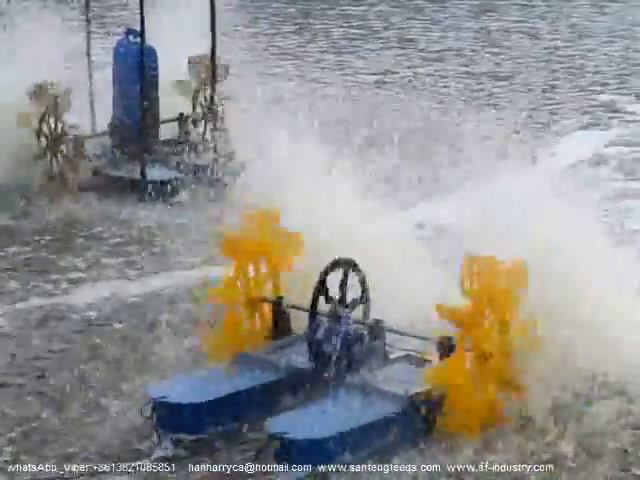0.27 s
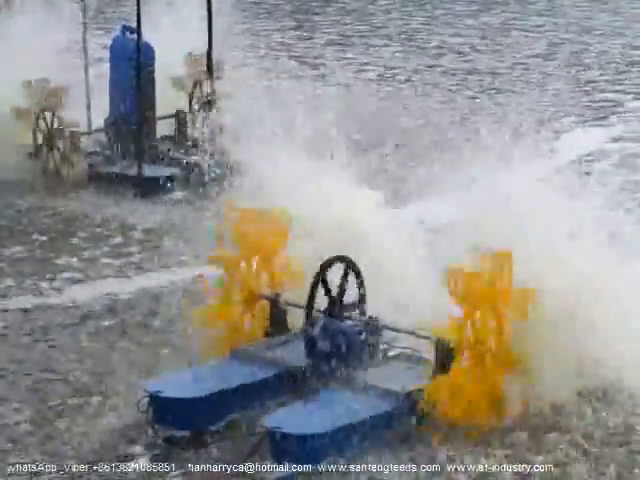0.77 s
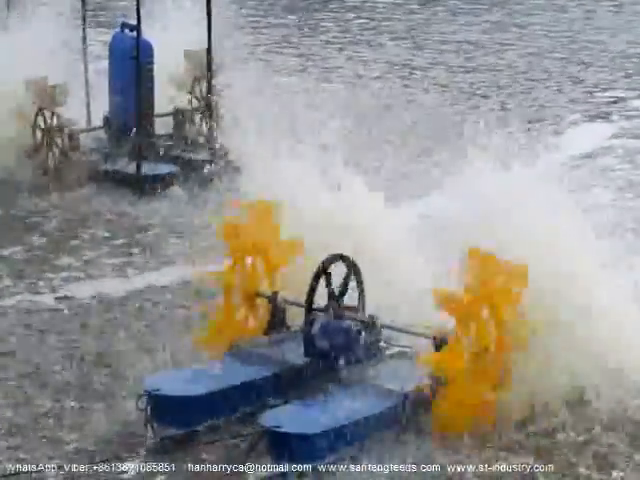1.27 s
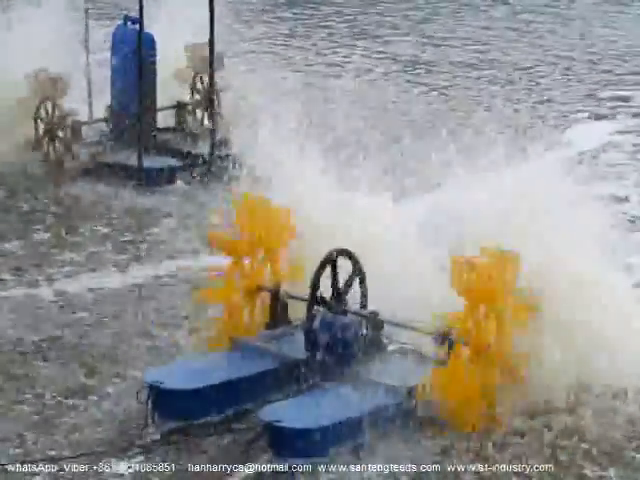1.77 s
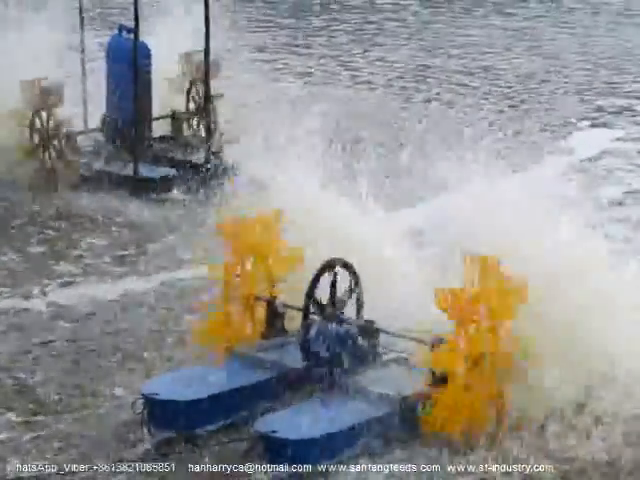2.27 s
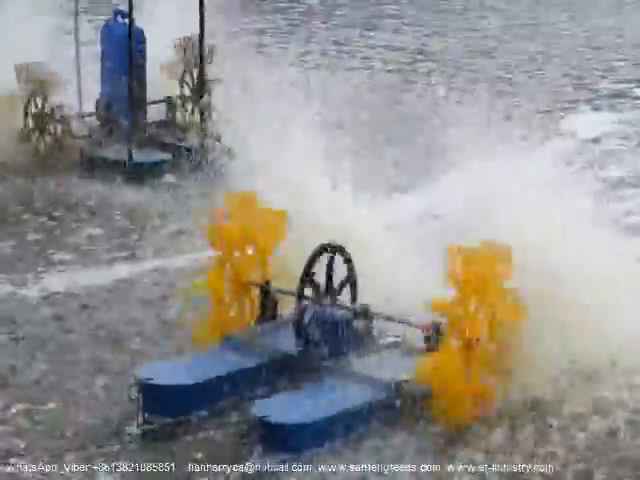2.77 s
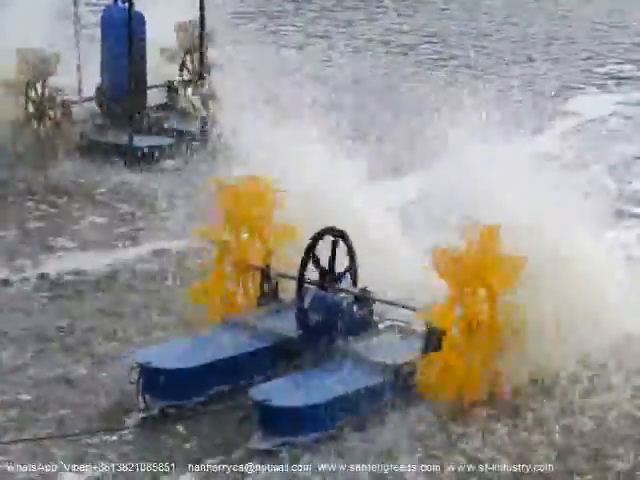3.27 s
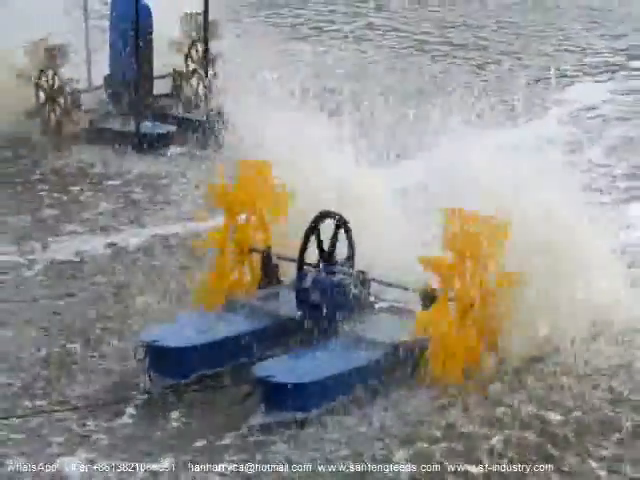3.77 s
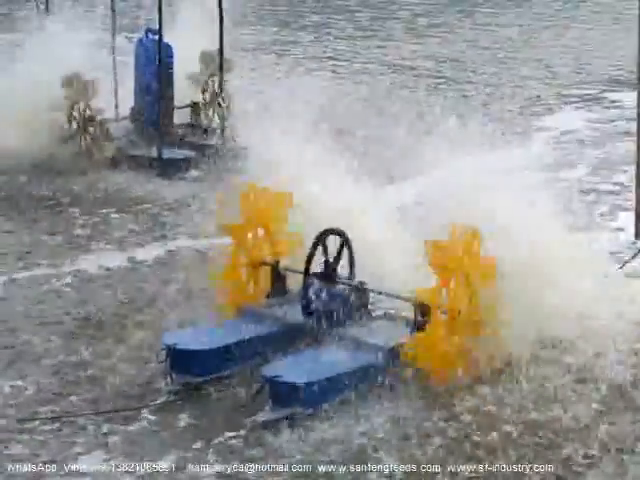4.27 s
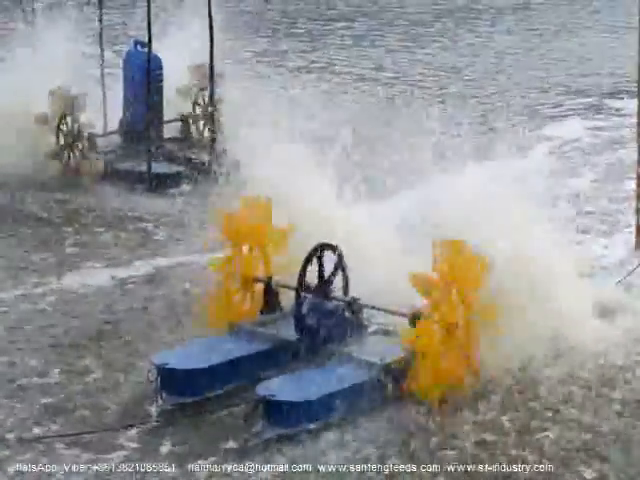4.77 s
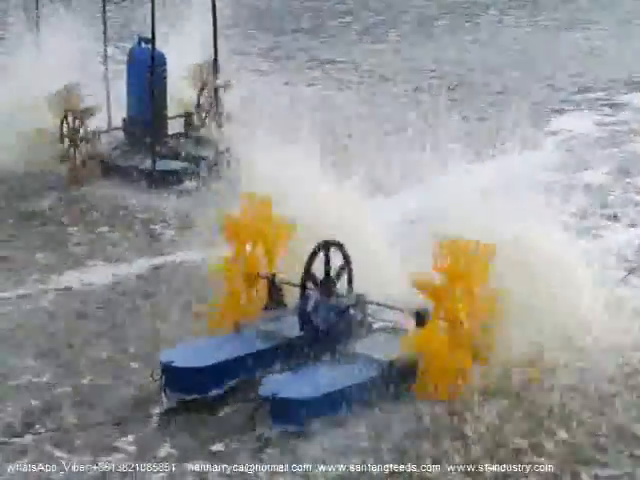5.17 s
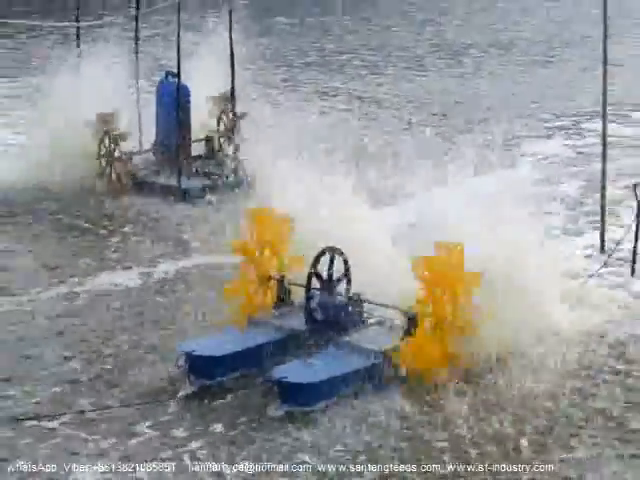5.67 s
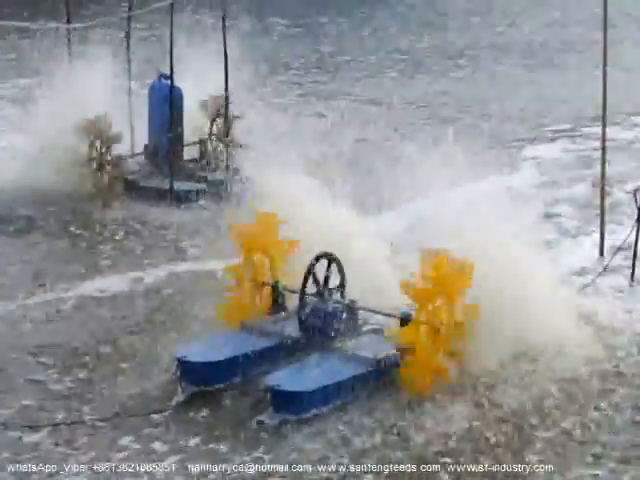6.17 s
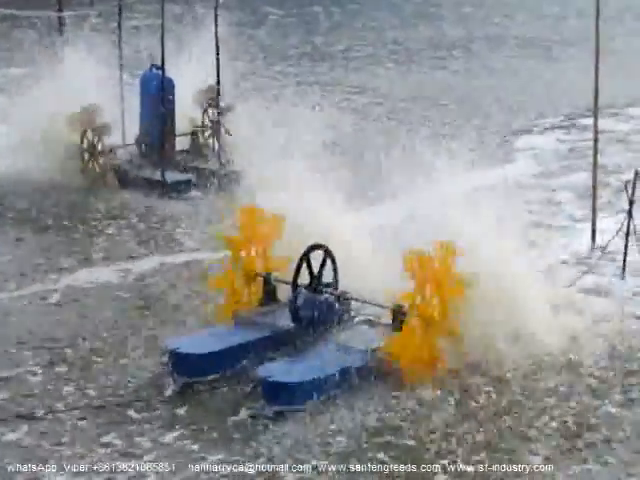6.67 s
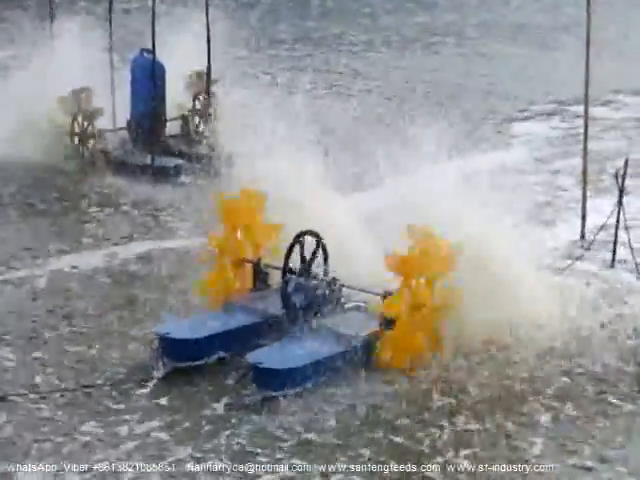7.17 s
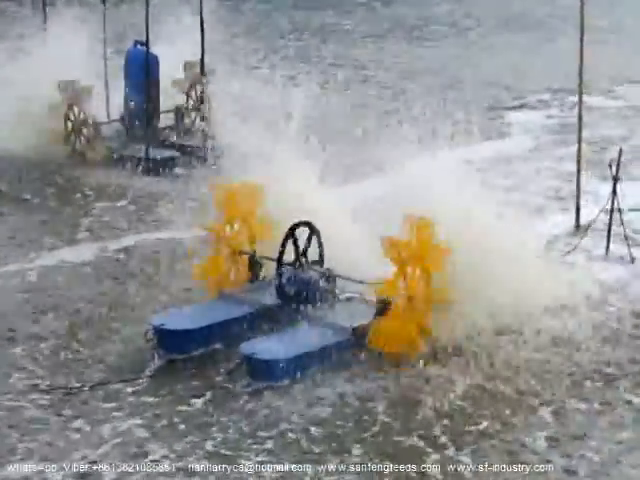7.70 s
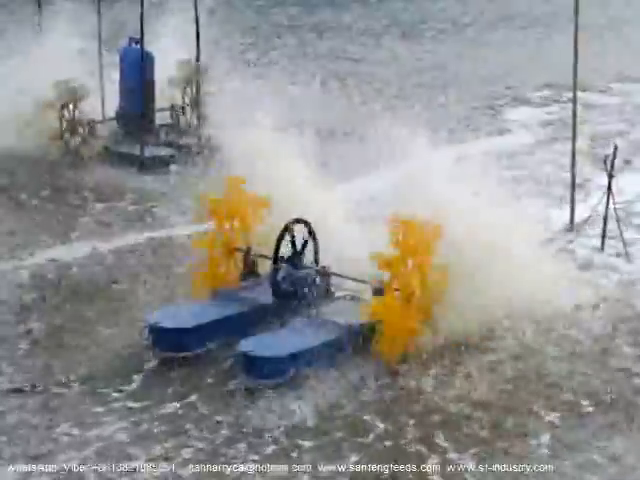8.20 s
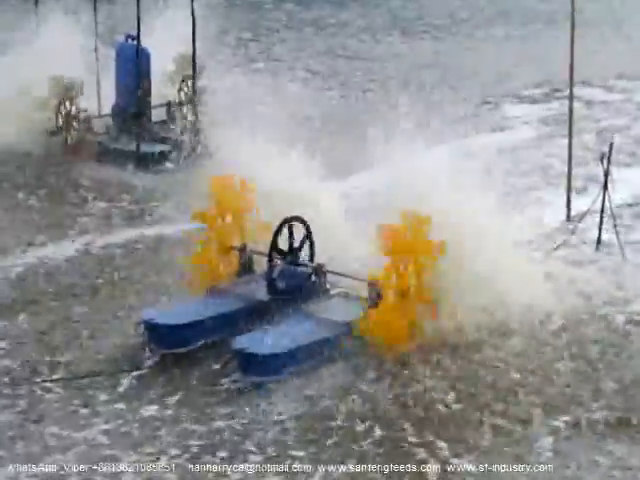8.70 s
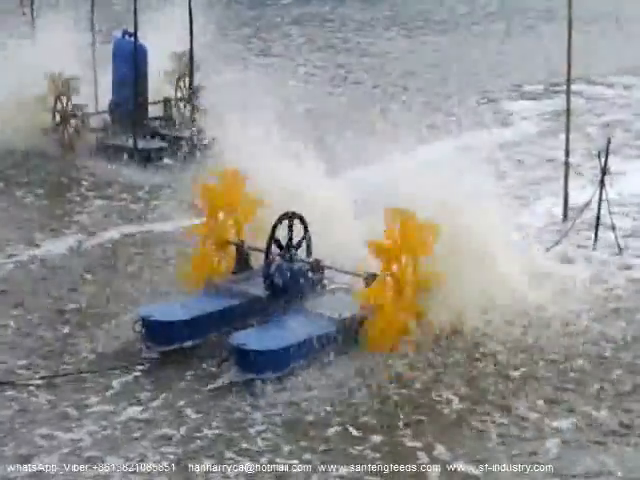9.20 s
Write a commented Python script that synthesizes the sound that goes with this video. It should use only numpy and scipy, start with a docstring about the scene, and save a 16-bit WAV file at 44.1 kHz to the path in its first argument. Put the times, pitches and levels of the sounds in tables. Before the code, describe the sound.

Buffeting wind gusts dominate while paddles churn a pond behind, a steady geared drone under bubbling roar and spray, clearer as gusts thin out late.

```python
"""A paddle-wheel aerator churns a fish pond: bubbling roar, hissing spray and a few near slaps of water.
Its geared drive hums in steady overtones and shakes the frame into a dull drone.
Position: on the bank, with the two microphone ports of a hand-held camera.
In front of it all, wind rumbles, flaps and thumps on the ports; its gusts thin out near the end.
Water is shaped noise, drops and ringing bubbles; the hum is wavering tones; wind is low noise in gusts."""
import sys
import numpy as np
from scipy import signal
from scipy.fft import rfft, irfft
from scipy.io import wavfile
from scipy.ndimage import uniform_filter1d

SR = 44100
rng = np.random.default_rng(int(sys.argv[2]) if len(sys.argv) > 2 else 0)


def unload_wav(signal):
    """Save mono or channel-first audio to the path in sys.argv[1] as 16-bit WAV at rate SR, clipped to [-1, 1]."""
    wavfile.write(
        sys.argv[1],
        SR,
        np.round(np.clip(np.atleast_2d(signal).T, -1, 1) * 32767).astype(np.int16),
    )


N = 416304
TIME = np.arange(N) / SR  # s
BINS = np.fft.rfftfreq(N, 1 / SR)  # Hz

# Level at which spray, churn and hum are heard; it sinks after strong gusts, as under a gain control:
# [t/s, level/dB before each layer's trim]
HEARD_LEVEL = [(0.03, -43.5), (0.76, -41.5), (1.16, -37), (1.99, -35.5), (2.6, -42.5), (2.99, -38),
               (3.33, -43.5), (4.22, -47), (4.56, -52), (5.04, -42), (5.53, -50.5), (6.37, -37.5),
               (7.39, -35.5), (7.68, -40.5), (7.95, -37), (8.78, -33.5), (9.07, -34), (9.44, -34)]
# Weight of the roar, greater toward the end: [t/s, churn level/dB relative to HEARD_LEVEL, before trim]
CHURN_WEIGHT = [(0, 2.3), (2.0, 1.5), (4.9, 2), (6.3, 1.5), (7.3, 4.5), (8.4, 7.5), (9.44, 5.5)]
# Spectrum of the heavy water off the paddles: [f/Hz, level/dB per Hz]
CHURN_COLOUR = [(40, -21), (110, 5), (200, 3), (330, 4), (440, -1.5), (550, -0.5), (660, -1.5), (900, -3),
                (1320, -9.5), (1700, -9.5), (2500, -22.5), (4000, -25), (9000, -42)]
# Spectrum of the fine spray: [f/Hz, level/dB per Hz]
SPRAY_COLOUR = [(400, 0), (1320, -5), (2000, 4), (2900, 3.5), (3300, -.5), (3700, 1.5), (4700, 1),
                (5500, -2.5), (7000, -4), (8600, -6), (10300, -4), (12400, 0), (13300, -3), (14300, -4.5)]
# Late widening of the hiss, strongest at 8.3 to 8.9 s: [t/s, level/dB relative to HEARD_LEVEL]
WIDE_HISS_LEVEL = [(3.5, -36), (7.9, -13), (8.3, -2), (8.85, 4), (9.15, -16), (9.44, -1)]
# Spectrum of the wide hiss, noise unlike at the two ports: [f/Hz, level/dB per Hz]
WIDE_HISS_COLOUR = [(1500, -18), (3000, -10), (4800, -16), (6000, -5), (9000, -9), (12500, -10),
                    (14300, -1.5)]
# Single drops slapping down close by: [t/s, level/dB before the decay, centre f/Hz, width/octaves, decay/s]
SLAPS = [(.722, -45.5, 1200, .6, 0.0032), (1.570, -28, 11000, .3, 0.0023), (2.923, -29.5, 1700, .5, 0.0054),
         (3.571, -34, 1850, 0.29, .005), (7.648, -29, 1300, .7, .004), (8.305, -27, 1300, .7, .004)]
# Overtones of the geared drive: [multiple of the mesh rate, level/dB relative to the hum,
# unsteadiness/0-1, share of the shared slow change of level that it follows/0-1]
GEAR_ORDERS = [(.5, 1, 0.1, 0.57), (1, 7, 0.24, 0.65), (2, 3, 0.47, 0.96), (3, -4.5, 0.5, 1),
               (4, -10, 0.89, 1), (6, -14.5, 0.54, 0.94), (7, -19.5, 0.4, 1)]
MESH_HZ = 128.55
# The hum follows HEARD_LEVEL (dB per dB) from its usual level up to a ceiling
USUAL_SPRAY_DB, HUM_DB, HUM_FOLLOWS, HUM_TOP_DB = -39.5, -34.5, 1, -31
# Resonances of frame and floats, shaken by the drive: [f/Hz, width/Hz, level/dB relative to the hum]
FRAME_MODES = [(320, 16, -14), (377.5, 17, -8), (507, 16, -12.5), (538.3, 31, -6.5), (760, 68, -28)]
# Likeness of the pond sound at the two ports: [f/Hz, likeness/0-1]
PORT_LIKENESS = [(100, 0.99), (300, 0.91), (900, 0.92), (1900, 0.98), (3100, 1), (5000, .98), (8000, 1),
                 (10500, 0.84), (14000, 0.62)]
# Level difference of the pond sound between the ports: [f/Hz, left minus right level/dB]
PORT_BALANCE = [(100, -19), (300, -10), (600, -5.5), (1000, -3.4), (1600, -1), (2800, -0.5), (7000, 0),
                (10500, -1.2), (14000, 0)]
# Phase difference of the pond sound between the ports: [f/Hz, left lead/rad]
PORT_LEAD = [(100, -0.036), (400, -0.0036), (1200, -0.63), (2000, -0.53), (3000, 0.18), (7000, -0.32),
             (11500, -0.39), (14000, -.1)]
# Breeze between gusts: it sinks, swells again around 7.2 s, then eases:
# [t/s, rumble level/dB, left flapping level/dB, right flapping level/dB]
BREEZE = [(0, -18.5, -35, -39), (2.7, -22, -33, -32), (3.7, -23.5, -39, -40), (4.85, -21, -30.5, -31),
          (5.6, -27.5, -56, -45), (7.2, -17, -39, -36), (8.2, -25, -42, -44), (9.44, -25, -35, -46)]
# Gusts: [start t/s, length/s, rumble level/dB, left flapping level/dB, right flapping level/dB]
GUSTS = [(0.0, 0.14, -15, -20, -29), (0.302, .13, -15.5, -26.5, -25), (0.555, 0.16, -20, -18.5, -33),
         (0.84, 0.056, -23, -42, -22), (1.085, .33, -21, -21, -25), (1.47, 0.13, -18.5, -18.5, -26),
         (1.675, .08, -16, -33, -17.5), (1.91, 0.13, -19.5, -32, -30), (2.08, 0.23, -11.5, -29, -23),
         (2.32, 0.11, -12.5, -31, -18), (2.86, 0.19, -13.5, -21.5, -23.5),
         (3.096, 0.061, -11.5, -17.5, -28), (3.209, 0.15, -12, -26, -27), (3.425, .1, -14.5, -23.5, -26),
         (3.803, 0.16, -18.5, -40, -20.5), (4.167, 0.12, -15, -31, -18.5), (4.347, 0.12, -12.5, -33, -24),
         (4.59, 0.16, -26, -35, -31), (4.99, 0.15, -16, -19.5, -25), (5.239, 0.19, -16, -37, -21.5),
         (5.753, 0.13, -17.5, -44, -25), (5.986, .06, -23, -46, -25), (6.27, 0.045, -17.5, -41, -29),
         (6.543, 0.065, -15.5, -42, -27), (6.887, 0.32, -16.5, -31, -28), (7.258, .1, -17.5, -31, -22),
         (7.502, 0.065, -14, -39, -26), (7.65, 0.066, -17, -36, -36), (8.888, 0.075, -18, -36, -43),
         (9.195, 0.086, -22.5, -36, -42)]
GUST_ATTACK_S, GUST_RELEASE_S = 0.035, 0.03
# The left port is sheltered from rumble (dB), less so when a gust comes from its side (dB per dB of flapping)
LEFT_RUMBLE_DB, RUMBLE_TURNS = -8, 0.28
# Spectrum of the wind's slow pressure swings: [f/Hz, level/dB per Hz]
RUMBLE_COLOUR = [(4, -21), (14, 5.5), (28, -1.5), (60, 1.5), (100, -2), (135, -6), (190, -23.5), (400, -42),
                 (1000, -90)]
# Spectrum of the small eddies flapping on each port: [f/Hz, level/dB per Hz]
FLAP_COLOUR = [(40, -20), (100, -4), (150, -1), (220, -5), (320, -12.5), (480, -19.5), (750, -33.5),
               (1300, -64), (4000, -95)]
# Hardest eddies thumping the ports: [t/s, left level/dB, right level/dB, swing f/Hz, overload factor]
THUMPS = [(0.599, -14, -19, 110, 1.8), (1.521, -10, -28, 380, 1), (2.236, -21, -5.5, 56, 1.4),
          (2.445, -22, -8, 74, 1.1), (3.147, -18, -6, 134, 0.86), (4.264, -29, -11, 79.4, 5.6),
          (4.392, -28, -15, 54.7, 0.87), (5.024, -14, -17, 45, 1)]
EDGE_HZ = 14290  # upper band limit of the camera


def churn(level_db, slosh):
    """Paddles dig into the pond: a dull roar of clumped impacts, full of bubbles."""
    roar = clumped(impacts(per_s=6000, spread_db=2.0), patchy_db=1.24, patch_hz=700, patch_s=0.029)
    roar = coloured(at_ports(roar), CHURN_COLOUR) * gain_of(5.0 + 0.34 * slosh)
    gurgle = bubbles(per_s=260, low_hz=526, high_hz=2735, cycles=7.4, count=20)
    gurgle = gurgle * gain_of([[-13], [-10.5]])  # left, right
    return (roar + gurgle) * gain_of(level_db)


def impacts(per_s, spread_db):
    """Random drops, most small and a few large."""
    size = gain_of(spread_db * np.minimum(rng.exponential(1, (2, N)), 4))
    sign = rng.choice([-1, 1], (2, N))
    lands = rng.random((2, N)) < per_s / SR
    return evened(size * sign * lands)


def bubbles(per_s, low_hz, high_hz, cycles, count):
    """Trapped air rings briefly, rising in pitch as it nears the surface."""
    t, out = np.arange(2048) / SR, np.zeros(N)
    for hz in np.geomspace(low_hz, high_hz, count):
        age = t * hz / cycles  # in decay times
        ring = np.exp(-age) * np.sin(2 * np.pi * hz * t * (1 + 0.034 * age))
        births = (rng.random(N) < per_s / count / SR) * rng.exponential(1, N)
        out += signal.oaconvolve(births, ring)[:N]
    return evened(out)


def spray(level_db, slosh):
    """Fine spray hisses, larger drops patter, and a close surface adds one faint echo."""
    drops = rng.standard_normal((2, N)) + gain_of(-3.0) * impacts(per_s=1800, spread_db=0.5)
    drops = at_ports(clumped(drops, patchy_db=1.19, patch_hz=2200, patch_s=0.025))
    echo_s = 0.00182
    echo = 0.064 * np.exp(-2j * np.pi * BINS * echo_s)
    drops = irfft(rfft(drops) * (1 - echo), N)  # the echo returns inverted
    return coloured(drops, SPRAY_COLOUR) * gain_of(level_db + 1.5 + 0.31 * slosh)


def wide_hiss(level_db):
    """Patchy noise, unlike at the two ports, widens the hiss late on."""
    fizz = clumped(rng.standard_normal((2, N)), patchy_db=4.0, patch_hz=2000, patch_s=0.018)
    return coloured(fizz, WIDE_HISS_COLOUR) * gain_of(level_db + played(WIDE_HISS_LEVEL)[0])


def slaps():
    """Each near drop is a short, quickly dying burst in one band, alike at both ports."""
    out, size = np.zeros(N), 4096
    t = np.arange(size) / SR
    hz = np.fft.rfftfreq(size, 1 / SR) + 1  # + 1 avoids log of zero
    for s, db, centre_hz, octaves, decay_s in SLAPS:
        band = np.exp(-0.5 * (np.log2(hz / centre_hz) / octaves) ** 2)
        burst = evened(irfft(rfft(rng.standard_normal(size)) * band, size))
        envelope = np.exp(-t / decay_s) * (1 - np.exp(-t / 0.0004))
        part = out[round(s * SR):][:size]
        part += (gain_of(db) * burst * envelope)[:len(part)]
    return out


def clumped(pair, patchy_db, patch_hz, patch_s):
    """Sound falls in clumps: short patches in time and pitch swell and fade."""
    hz, t, z = signal.stft(pair, SR, nperseg=256)
    field = rng.standard_normal(z.shape[1:])
    field = uniform_filter1d(field, max(1, int(patch_hz / hz[1])), axis=0)
    field = uniform_filter1d(field, max(1, int(patch_s / t[1])), axis=1)
    patchy = z * gain_of(patchy_db * evened(field))
    return signal.istft(patchy, SR, nperseg=256)[1][:, :N]


def drive(hum_db):
    """Gear teeth mesh at a steady rate; the changing paddle load makes each overtone waver."""
    turns = np.cumsum(MESH_HZ + 0.14 * wander(rate_hz=2.18)) / SR
    out = np.zeros((2, N))
    for order, db, unsteady, follows in GEAR_ORDERS:
        drift = evened(wander(rate_hz=7.3) + 1j * wander(rate_hz=3.1))  # in level and phase
        waver = np.sqrt(1 - unsteady ** 2) + unsteady * drift
        level = gain_of(db + HUM_DB + follows * (hum_db - HUM_DB))
        line = level * waver * np.exp(2j * np.pi * (order * turns + rng.random()))
        left = line * np.exp(1j * read(PORT_LEAD, order * MESH_HZ))
        out += np.sqrt(2) * np.array([left, line]).real
    return out * gain_of([[-5.5], [3]])  # left, right


def frame(hum_db):
    """The shaken frame drones in a few broad resonances."""
    response = 0
    for hz, width, db in FRAME_MODES:
        response = response + gain_of(db) / np.sqrt(width) / (1 + 2j * (BINS - hz) / width) ** 2
    shake = irfft(rfft(rng.standard_normal((2, N))) * response * np.sqrt(2 * SR / np.pi), N)
    return at_ports(shake) * gain_of(hum_db)


def at_ports(pair):
    """Two unrelated sounds become what the two close ports pick up from the pond."""
    a, b = rfft(pair)
    same = read(PORT_LIKENESS, BINS)
    # half of the level and phase difference goes to each port
    tilt = gain_of(read(PORT_BALANCE, BINS) / 2) * np.exp(0.5j * read(PORT_LEAD, BINS))
    ports = np.array([a * tilt, (same * a + np.sqrt(1 - same ** 2) * b) / tilt])
    return irfft(ports / abs(tilt + 1 / tilt), N)


def wind(shared, lumpy_db):
    """Large eddies press partly alike on both ports; small ones flap on each port alone."""
    a, b = rng.standard_normal((2, N)) * gain_of(lumpy_db / 2 * wander(rate_hz=28))
    left = (signal.hilbert(a) * np.exp(0.55j)).real  # the gust reaches the left port first
    right = shared * a + np.sqrt(1 - shared ** 2) * b
    rumble_gain, flap_gain = wind_strength()
    rumble = coloured(np.array([left, right]), RUMBLE_COLOUR) * rumble_gain
    lumps = gain_of(lumpy_db * np.array([wander(rate_hz=24), wander(rate_hz=30)]))
    flaps = coloured(rng.standard_normal((2, N)) * lumps, FLAP_COLOUR) * flap_gain
    return rumble + flaps + thumps()


def wind_strength():
    """Gusts add their power to the breeze: gains of the rumble and of the flapping at both ports."""
    power = gain_of(played(BREEZE)) ** 2
    for start, length, rumble_db, left_db, right_db in GUSTS:
        gust = gain_of([[rumble_db], [left_db], [right_db]]) * gust_shape(start, length)
        power += gust ** 2
    rumble, left, right = np.sqrt(power)
    shelter = gain_of(LEFT_RUMBLE_DB) * (left / right) ** RUMBLE_TURNS
    return np.array([rumble * shelter, rumble]), np.array([left, right])


def gust_shape(start, length):
    """A gust builds quickly, holds, and dies away."""
    age = TIME - start
    rise = np.clip(age / GUST_ATTACK_S + 0.5, 0, 1)  # half way up at the start time
    return rise * np.exp(-np.clip((age - length) / GUST_RELEASE_S, 0, 20))


def thumps():
    """A hard eddy is a push and pull of pressure, flattened where it overloads the port."""
    out, t = np.zeros((2, N)), np.arange(-2048, 2048) / SR
    for s, left_db, right_db, hz, overload in THUMPS:
        swing = np.sin(2 * np.pi * hz * t) * np.exp(-(hz * t) ** 2)
        flattened = np.tanh(overload * swing) / np.tanh(overload)
        start = round((s + t[0]) * SR)
        out[:, start:start + len(t)] += gain_of([[left_db], [right_db]]) * flattened
    return out


def gain_of(db):
    """Decibels to amplitude."""
    return 10 ** (np.asarray(db) / 20)


def evened(x):
    """Scales to rms 1."""
    return x / np.sqrt(np.mean(abs(x) ** 2) + 1e-20)


def read(points, hz):
    """Reads a spectrum table on a log-frequency axis."""
    f, value = np.transpose(points)
    return np.interp(np.log(hz + 1), np.log(f + 1), value)


def played(rows):
    """The columns of a curve table, sample by sample."""
    s, *columns = np.transpose(rows)
    return np.array([np.interp(TIME, s, c) for c in columns])


def wander(rate_hz):
    """Slow random drift of rms about 1: low-passed noise on a coarse time grid."""
    size = 4096
    hz = np.fft.rfftfreq(size, N / SR / size)
    slow = evened(irfft(rfft(rng.standard_normal(size)) / (1 + (hz / rate_hz) ** 2), size))
    return np.interp(TIME, np.linspace(0, N / SR, size), slow)


def coloured(x, colour):
    """Filters a sound by a spectrum table, then scales to rms 1 over both ports."""
    return evened(irfft(rfft(x) * gain_of(read(colour, BINS)), N))


def scene():
    """Water, machine and wind together; one heard level and one uneven slosh move both roar and spray."""
    spray_db = played(HEARD_LEVEL)[0]
    churn_db = spray_db + played(CHURN_WEIGHT)[0]
    hum_db = np.minimum(HUM_DB + HUM_FOLLOWS * (spray_db - USUAL_SPRAY_DB), HUM_TOP_DB)
    slosh = wander(rate_hz=23)
    water = churn(churn_db, slosh) + spray(spray_db, slosh) + wide_hiss(spray_db) + slaps()
    machine = drive(hum_db) + frame(hum_db)
    return water + machine + wind(shared=0.58, lumpy_db=3.5)


def record(dry):
    """The ports round off the very largest swings; then the camera's band limit."""
    ceiling = 0.92
    held = dry / (1 + (dry / ceiling) ** 8) ** (1 / 8)
    lowpass = signal.firwin(1023, EDGE_HZ, window=("kaiser", 9), fs=SR)
    return signal.oaconvolve(held, lowpass[None], "same")


dry = scene()
out = record(dry)
unload_wav(out)
```